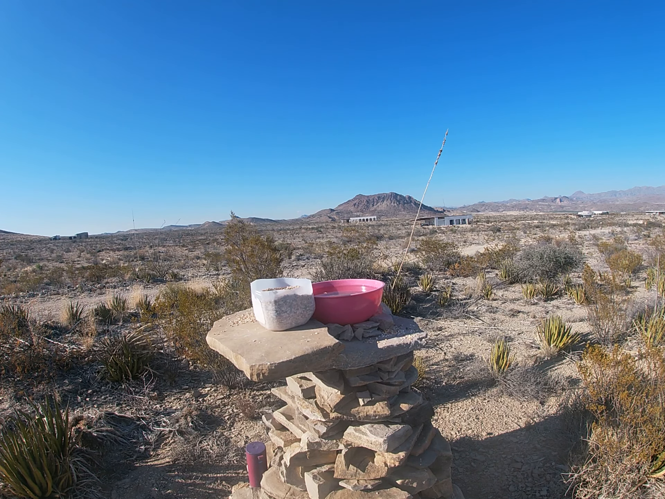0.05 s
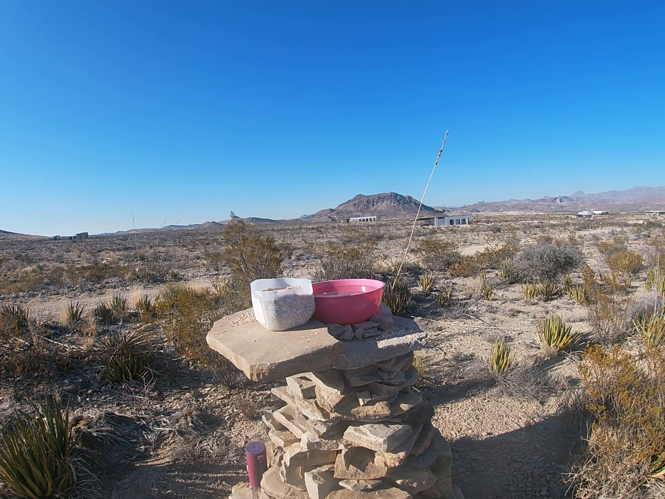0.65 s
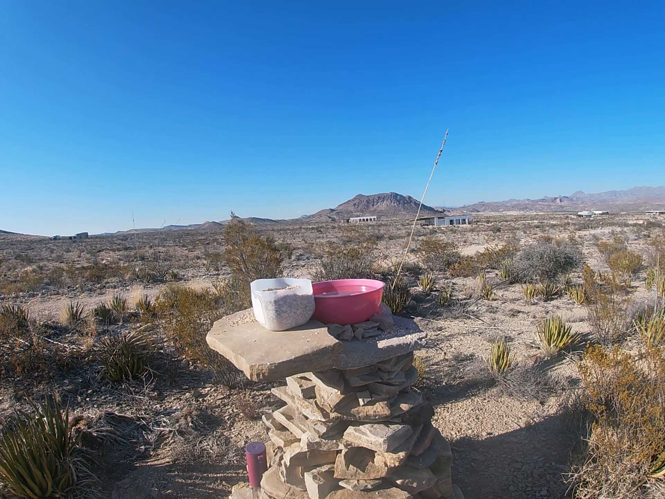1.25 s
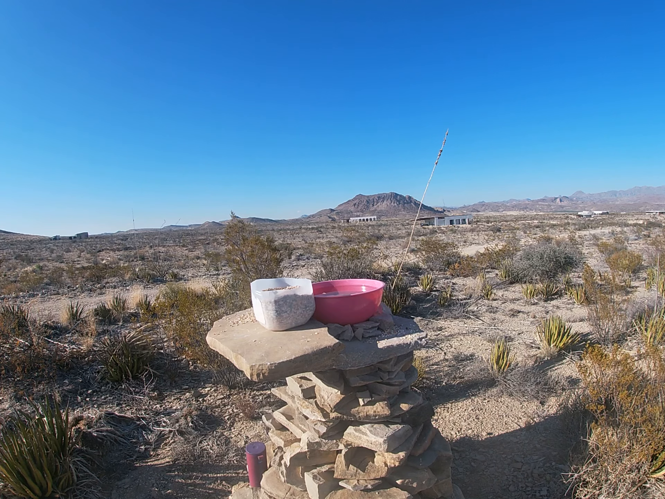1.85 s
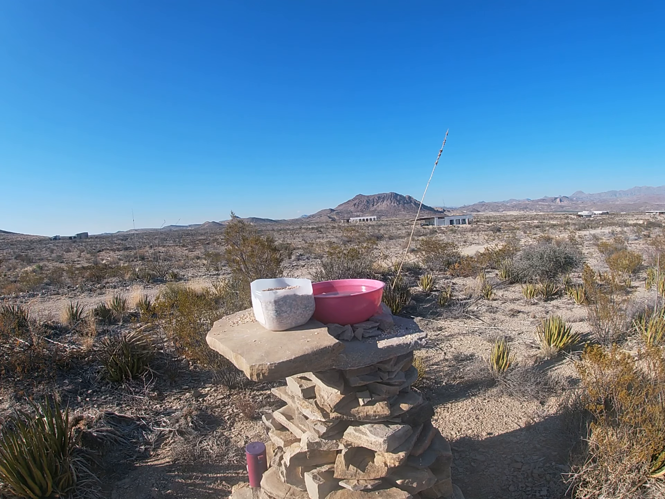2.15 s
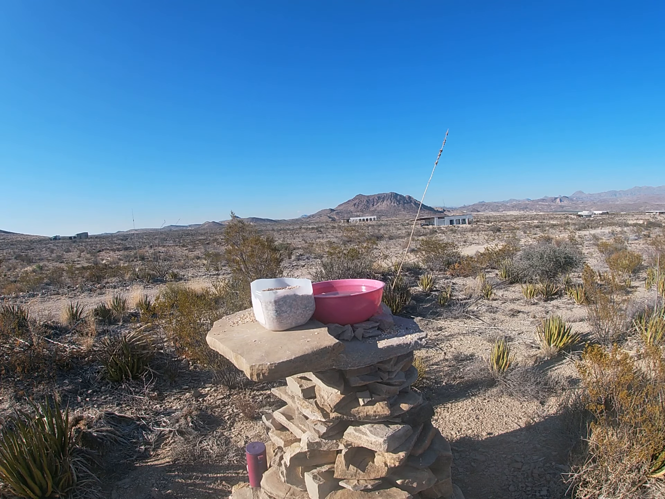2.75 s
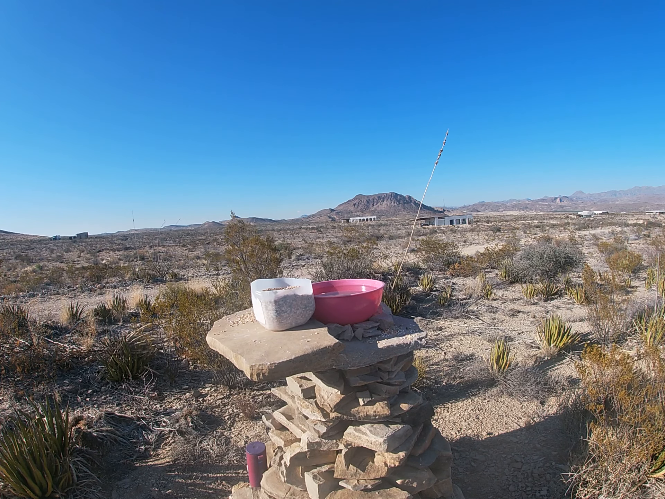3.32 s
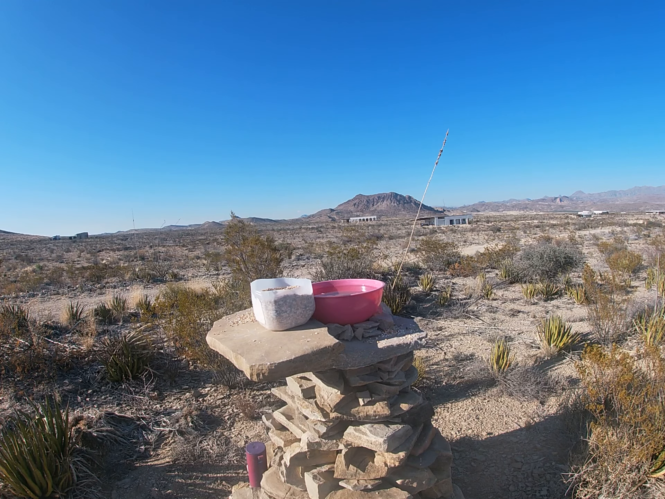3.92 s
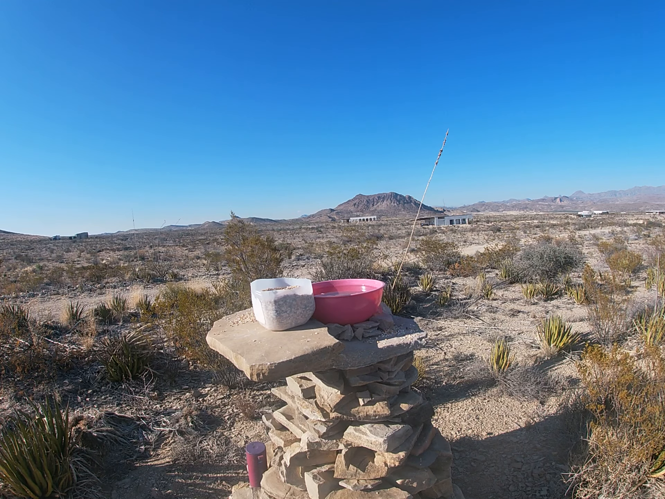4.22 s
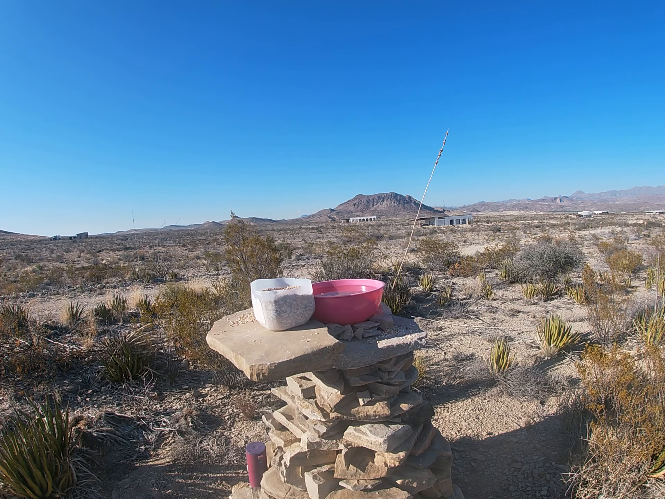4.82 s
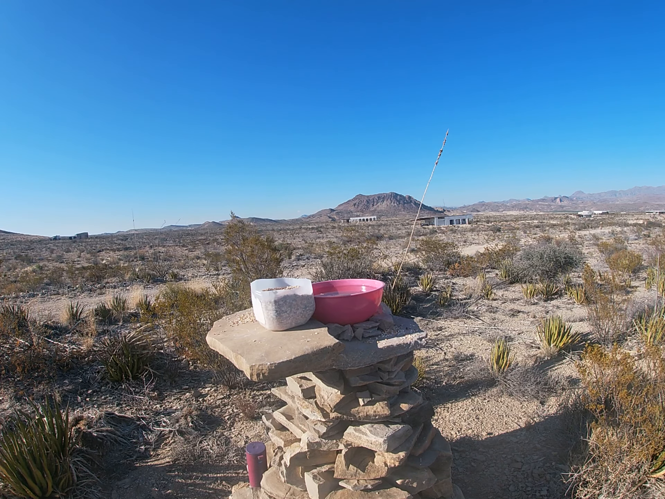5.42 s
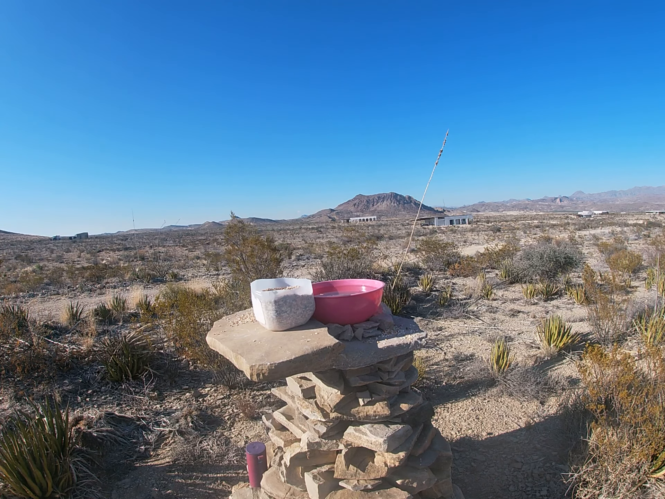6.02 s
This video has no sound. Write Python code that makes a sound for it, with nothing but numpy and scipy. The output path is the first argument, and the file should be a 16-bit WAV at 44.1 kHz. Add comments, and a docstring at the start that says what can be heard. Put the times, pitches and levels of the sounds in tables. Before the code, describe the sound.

In open desert, a light breeze rumbles on a single microphone, with a few faint, dull bumps far off. A roadrunner starts a quick run of about twenty short yips, each rising and falling in pitch. The breeze drops, then builds to a gust that thumps the microphone, and a small bird chips once nearby. The yips slow and stop, leaving wind and faint distant chirps.

```python
"""Open desert, one microphone in a light breeze. Dry scrub stirs and three dull bumps sound far off.
From about one second a roadrunner gives twenty short yips, each one arch of pitch, loudest at its top;
ground and rocks reflect them and the scrub scatters a faint tail. The breeze drops, then builds to a gust
whose eddies thump the microphone. Near four seconds a small bird chips once, close by. The yips slow
and stop at five seconds, leaving the wind and the last of a few distant chirps."""
import sys
import numpy as np
from scipy import signal
from scipy.fft import rfft, irfft
from scipy.io import wavfile
from scipy.ndimage import uniform_filter1d

SR = 44100
rng = np.random.default_rng(int(sys.argv[2]) if len(sys.argv) > 2 else 0)


def bounce(signal):
    """Save signal as a 16-bit WAV file at the path given by the first command-line argument."""
    frames = np.transpose(np.atleast_2d(signal))
    limited = np.clip(frames, -1, 1)
    pcm = np.round(limited * 32767).astype(np.int16)
    wavfile.write(sys.argv[1], SR, pcm)


N = 272272
TIME = np.arange(N) / SR

# Colours of the far-off air, a thin hiss and dry leaves. Each row: frequency in Hz, gain in dB.
AIR_SPECTRUM = [(120, -22), (200, -18), (330, -15.5), (570, -12), (640, -22), (710, -10.5), (930, -14.5),
                (1200, -28), (1500, -23.5), (1900, -33), (2900, -34.5), (4000, -63), (7000, -92)]
HISS_SPECTRUM = [(300, -6.5), (2500, 0.5), (3800, -1), (5300, 0.5), (7500, -5.5), (10000, -12.5),
                 (12500, -22.5)]
LEAF_SPECTRUM = [(200, -7), (400, 14), (1000, -2.5), (2500, -10), (5500, -7), (9000, -24)]
# The air settling. Each row: time in seconds, level in dB.
AIR_COURSE = [(0, -57.5), (.3, -60), (.8, -63.5), (2, -62.5), (4, -63.5), (5.3, -65.5), (6.17, -64)]
# Distant bumps. Each row: middle in seconds, frequency in Hz, level in dB, length in seconds.
FAR_BUMPS = [(0.043, 364, -44, 0.062), (0.149, 480, -50.5, 0.035), (0.326, 350, -50, 0.034)]
# Distant birds. Each row: middle in seconds, pitch in Hz, level in dB, length in seconds,
# pitch scatter as a share.
FAR_CHIRPS = [(1.945, 6300, -71.5, 0.057, .06), (3.032, 4920, -69, 0.026, 0.029),
              (5.419, 2610, -65, 0.033, 0.093), (5.964, 2100, -67, 0.075, 0.11)]
# The close bird's one chip. Each row: time in seconds, pitch in Hz, level in dB.
NEAR_CHIP = [(3.9825, 7200, -68), (3.9845, 6750, -50), (3.9875, 6750, -50), (3.9905, 7000, -45),
             (3.994, 7250, -49), (3.999, 7450, -52), (4.001, 7300, -70)]
# Wind at the microphone. Each row: time in seconds, relative level in dB, hardness in dB (more gust).
WIND_COURSE = [(0, -48, -21.5), (.15, -38, -23), (0.359, -44.5, -18.5), (.7, -40.5, -24.5),
               (1.35, -49, -14.5), (1.88, -43.5, -15), (2.15, -65.5, -15), (2.5, -50, -15),
               (2.95, -50, -11.5), (3.27, -45, -10.5), (3.399, -38.5, -7.5), (3.72, -40, -7.5),
               (3.92, -52.5, -15.5), (3.99, -34, -8.5), (4.3, -23, -6), (4.599, -37, -7), (4.73, -30, -8.5),
               (4.98, -38.5, -14.5), (5.18, -33.5, -17), (5.36, -38.5, -18.5), (5.88, -34.5, -6.5),
               (6.17, -54, -19)]
# Rumble of a light breeze and of a hard gust. Each row: frequency in Hz, gain in dB.
BREEZE_SPECTRUM = [(10, -8.5), (25, 4.5), (42, 4), (70, -5), (110, -30.5), (170, -33), (260, -48),
                   (500, -62), (1000, -87.5)]
GUST_SPECTRUM = [(10, -20.5), (25, 0.5), (50, 1), (95, 0), (140, -7.5), (200, -19.5), (300, -33.5),
                 (500, -51), (1000, -91.5)]
# Eddies striking the microphone. Each row: middle in seconds, relative level in dB, frequency in Hz.
EDDY_THUMPS = [(0.976, -34, 133), (1.206, -25.5, 82), (1.53, -25.5, 70), (1.83, -28, 101.4),
               (2.31, -45.5, 150), (2.575, -40, 135), (3.041, -22.5, 66), (3.385, -18.5, 83.3),
               (3.519, -16, 82.3), (3.747, -27.5, 88.6), (3.977, -16, 73), (4.145, -12, 64.7),
               (4.28, -13, 71), (4.308, -11.5, 101), (4.331, -13.5, 95), (4.493, -13.5, 105.5),
               (4.682, -15, 81), (4.731, -11, 83.4), (5.141, -17, 32), (5.236, -15.5, 36.4),
               (5.72, -21.5, 119.5), (5.799, -33, 87.4), (5.83, -20.5, 118)]
# Reflections off ground and rocks. Each row: delay in seconds, gain.
GROUND_ECHOES = [(.00611, .35), (.0118, .26), (.0218, .16)]
# Colour of the scatter from the scrub. Each row: frequency in Hz, gain in dB.
SCRUB_SPECTRUM = [(250, -5.5), (550, -9), (1030, -2), (1160, 5), (1290, -1), (1700, -4), (3000, 3.5),
                  (7000, 1.5)]
# The roadrunner's voice sent into that scatter. Each row: time in seconds, gain in dB.
SCRUB_SEND = [(1, -17), (2.3, -19.5), (3.3, -16.5), (3.9, -18), (4.7, -14.5), (5.1, -9.5)]
# The run of yips. Each row: time of the top in seconds, top pitch in Hz, effort in dB, rise and fall
# in seconds, lift above the second harmonic in dB, lift of the second in dB.
YIP_RUN = [(0.8875, 464, -39.5, 0.0056, 0.037, 4.0, -3), (1.096, 545, -24, 0.024, 0.042, 2.5, -4.0),
           (1.2936, 568.0, -22, 0.03, 0.033, 3.5, -0.6), (1.4855, 581, -19, 0.0316, 0.032, 0.7, -2.5),
           (1.674, 587.5, -19, 0.031, 0.036, -0.6, -1.6), (1.8698, 588.6, -19, 0.033, 0.032, -0.5, -0.8),
           (2.0579, 587.7, -19, 0.031, 0.0343, -2.2, -0.6), (2.2526, 587, -20, 0.029, 0.033, 0.1, -0.5),
           (2.4428, 586.7, -19, 0.03, 0.034, -0.2, -1.2), (2.646, 587.7, -19.5, 0.027, 0.031, 0.4, 0),
           (2.8659, 580.5, -19.5, 0.03, 0.029, 0.6, -1), (3.0909, 476, -32, 0.015, 0.029, -0.5, -2),
           (3.2531, 575.0, -20.5, 0.029, 0.032, 2, -0.5), (3.481, 587.8, -19.5, 0.0321, 0.0341, 1, -0.5),
           (3.7031, 581, -20, 0.03, 0.032, 1.2, 1.7), (3.9284, 581, -20, 0.033, 0.031, 0.5, 1.5),
           (4.168, 584.4, -19.5, 0.032, 0.029, -0.3, -0.3), (4.4294, 565.8, -21.9, 0.036, 0.03, 1.5, 2.5),
           (4.6961, 570, -20.5, 0.032, 0.03, 1.5, 0.5), (5.0565, 522.3, -26.5, 0.0368, 0.0271, -0.4, 0.6)]
# Colours of throat and bill, and of the breath. Each row: frequency in Hz, gain in dB.
THROAT_RESPONSE = [(280, 3.5), (370, -13.5), (450, 2.5), (600, -4.5), (900, -12), (1000, -16),
                   (1150, -11.5), (1280, -12), (1420, -7.5), (1600, -23), (1760, -23), (1950, -32.5),
                   (2080, -40.5), (2350, -43.5), (2900, -43), (3400, -64.5), (4500, -77.5), (7500, -83)]
RASP_SPECTRUM = [(200, -29.0), (600, -1.0), (1500, -7), (2100, -16.5), (3000, -25.5), (3800, -41),
                 (5100, -32), (8000, -49.0)]
# The voice gains an edge along the run. Each row: time in seconds, lift above the fourth harmonic in dB,
# gain of the bill's ring in dB.
VOICE_EDGE = [(1, -7.5, -76), (2.2, -1.5, -69), (3.2, 0.5, -66), (3.9, 2.5, -67), (4.17, 6, -57),
              (4.43, -2, -49), (4.7, 3.5, -43.5), (5.05, 1, -52)]
# The lowest yips are muffled. Each row: top pitch in Hz, lift from the fourth harmonic up in dB.
MUFFLE = [(480, -5), (520, 5), (590, 1)]
# A thin ring in the bill: frequency in Hz, width in Hz.
BILL_RING = (5120, 330)
# A higher ring: frequency in Hz, width in Hz, gain in dB.
HIGH_BILL_RING = (6430, 200, -67.5)
# The bill opens late: seconds after the top, dB on the fourth harmonic when shut, half-width in seconds.
BILL_GAPE = (0.017, -4.5, 0.017)

REST_HZ, ARCH_POWER = 284, 3.15  # foot of each arch; a higher power flattens its top
CLEAR_HZ, HOARSE_HZ = 590, 480  # top pitches of a clear yip and of a slack one
TOP_DB, ONSET_DB, RELEASE_DB = 3, -36.5, -32.5  # lift at the top; drop to the foot before and after
LEAD, TRAIL, SOFT_ENDS = 1.5, 1.864, 0.48  # span before and after the top, end fades: in rises or falls
SECOND_FADE, UPPER_FADE = (0.27, 0.097), (.84, 0)  # overtone dB lost per dB below full: rising, falling
FLUTTER_DB, FLUTTER_HZ = 2.6, 11  # random flutter of the wind
CUTOFF_HZ = 12200


def from_db(db):
    """Decibels to gain."""
    return 10 ** (np.asarray(db) / 20)


def unit(x):
    """Scales to an rms of one."""
    return x / np.sqrt(np.mean(x ** 2) + 1e-20)


def colour(points, hz):
    """Gain of a (Hz, dB) table at the given frequencies."""
    f, db = np.transpose(points)
    return from_db(np.interp(np.log(hz + 1e-9), np.log(f), db))


def tinted(x, points):
    """Filters x by a (Hz, dB) table."""
    return irfft(rfft(x) * colour(points, np.fft.rfftfreq(len(x), 1 / SR)), len(x))


def noise(spectrum, size=N):
    """Coloured noise of rms one."""
    return unit(tinted(rng.standard_normal(size), spectrum))


def follow(table, at):
    """Reads each later column of a table at the given points along its first."""
    axis, *columns = np.transpose(table)
    return [np.interp(at, axis, column) for column in columns]


def wander(size, hz):
    """Smooth random motion of rms one, up to about hz."""
    spectrum = rfft(rng.standard_normal(size)) * np.exp(-(np.fft.rfftfreq(size, 1 / SR) / hz) ** 2)
    return unit(irfft(spectrum, size))


def add(mix, s, sound):
    """Mixes a sound in from time s."""
    part = mix[max(round(s * SR), 0):][:len(sound)]
    part += sound[:len(part)]


def blurred_tone(hz, length_s, spread, blur_hz):
    """A tone that swells and fades while its pitch wavers at random."""
    size = round(length_s * SR)
    phase = 2 * np.pi * np.cumsum(hz * (1 + spread * wander(size, blur_hz))) / SR
    return np.hanning(size) * np.sin(phase)


def desert_air(waver_db=2.0, hiss_db=-78):
    """A soft far-off wash that settles slowly, over a steady thin hiss."""
    wash, hiss = noise(AIR_SPECTRUM), noise(HISS_SPECTRUM)
    level_db = follow(AIR_COURSE, TIME)[0] - waver_db * wander(N, hz=7.9)
    return from_db(level_db) * wash + from_db(hiss_db) * hiss


def rustle(level_db=-72, middle_s=.2, half_width_s=0.4, grain_db=3):
    """Dry scrub stirs briefly in the breeze at the start."""
    leaves = noise(LEAF_SPECTRUM)
    stir = np.exp(-((TIME - middle_s) / half_width_s) ** 2)
    return from_db(level_db + grain_db * wander(N, hz=60)) * stir * leaves


def distant_bumps():
    """Short, dull sounds a long way off, with no clear pitch."""
    out = np.zeros(N)
    for s, hz, level_db, length in FAR_BUMPS:
        add(out, s - length / 2, from_db(level_db) * blurred_tone(hz, length, spread=0.15, blur_hz=90))
    return out


def scrub_scatter(x, early_t60=0.068, late_t60=0.3, late_db=-13):
    """Bushes and stones scatter a quick, thin tail; farther slopes a fainter, longer one."""
    t = np.arange(SR // 2) / SR
    decay = from_db(-60 * t / early_t60) + from_db(late_db - 60 * t / late_t60)
    onset = np.clip(t / 0.012, 0, 1) ** 2
    tail = rng.standard_normal(len(t)) * decay * onset
    return signal.fftconvolve(x, tinted(tail / np.linalg.norm(tail), SCRUB_SPECTRUM))[:N]


def small_birds(scatter_db=-12):
    """One thin rising chip close to the microphone, and blurred chirps from far off."""
    birds = np.zeros(N)
    t = np.arange(NEAR_CHIP[0][0], NEAR_CHIP[-1][0], 1 / SR)
    chip_hz, chip_db = follow(NEAR_CHIP, t)
    chip_hz *= 1 + .012 * wander(len(t), hz=700)
    add(birds, t[0], from_db(chip_db) * np.sin(2 * np.pi * np.cumsum(chip_hz) / SR))
    for s, hz, level_db, length, spread in FAR_CHIRPS:
        add(birds, s - length / 2, from_db(level_db) * blurred_tone(hz, length, spread, blur_hz=500))
    return birds + from_db(scatter_db) * scrub_scatter(birds, early_t60=0.11, late_t60=.4, late_db=-11.5)


def wind(even_mix_db=-6, trim_db=1.0):
    """Turbulence at the microphone's port: the harder the gust, the higher the rumble reaches."""
    level_db, hardness_db = follow(WIND_COURSE, TIME)
    blend = np.arctan(from_db(hardness_db - even_mix_db))
    rumble = np.cos(blend) * noise(BREEZE_SPECTRUM) + np.sin(blend) * noise(GUST_SPECTRUM)
    local_rms = np.sqrt(uniform_filter1d(rumble ** 2, size=3000) + 1e-9)
    steadied = unit(rumble / np.sqrt(local_rms))
    return from_db(level_db + trim_db + FLUTTER_DB * wander(N, FLUTTER_HZ)) * steadied


def eddies(cycles=0.56, trim_db=-2, wake_db=-15, wake_s=0.037, wake_hz=90):
    """Each eddy thumps the microphone: a pressure swing in a puff of turbulence, higher if quick."""
    out = np.zeros(N)
    t = np.arange(-SR // 10, SR // 10) / SR
    for (s, level_db, hz), turn in zip(EDDY_THUMPS, rng.random(len(EDDY_THUMPS))):
        swing = np.cos(2 * np.pi * (hz * t + turn)) / np.cosh(2 * hz * t / cycles)
        churn = noise([(f * hz / wake_hz, db) for f, db in GUST_SPECTRUM], len(t))
        puff = from_db(wake_db) * np.exp(-(t / wake_s) ** 2) * churn
        add(out, s + t[0], from_db(level_db + trim_db) * (swing + puff) * np.hanning(len(t)))
    return out


def yip(s, top_hz, effort_db, rise, fall, upper_db, second_db, jitter=0.0066, rasp_db=-43, hoarse_db=16,
        sag_per_s=2.0, swell_db=0.8, swell_s=.007, hum_db=-58, slack_hum_db=17):
    """Harmonics sweep up and down through the colour of throat and bill. Returns start and sound."""
    t = np.arange(-LEAD * rise, TRAIL * fall, 1 / SR)
    arch = np.exp(-abs(t / np.where(t < 0, rise, fall)) ** ARCH_POWER)
    foot_db = np.where(t < 0, ONSET_DB, RELEASE_DB)
    level_db = TOP_DB + (1 - arch) * foot_db + swell_db * np.tanh(t / swell_s)
    # the slacker the voice, the lower and hoarser the note, and the more it droops
    slack = np.clip((CLEAR_HZ - top_hz) / (CLEAR_HZ - HOARSE_HZ), 0, 1)
    hoarse = from_db(hoarse_db * slack ** 2)
    hz = REST_HZ + (top_hz * np.exp(-sag_per_s * slack ** 2 * t) - REST_HZ) * arch
    hz *= 1 + jitter * hoarse * wander(len(t), hz=230)
    phase = 2 * np.pi * np.cumsum(hz) / SR
    k = np.arange(1, 13)[:, None]  # harmonic numbers
    edge_db, bill_db = follow(VOICE_EDGE, s)
    muffle_db = follow(MUFFLE, top_hz)[0]
    voicing_db = second_db * (k == 2) + upper_db * (k > 2) + muffle_db * (k >= 4) + edge_db * (k > 4)
    # overtones bloom only at full strength, the highest when the bill gapes
    bloom, wilt = np.where(k == 2, SECOND_FADE, UPPER_FADE).T[:, :, None]
    fade_db = np.minimum(level_db, 0) * (k > 1) * np.where(t < 0, bloom, wilt)
    gape_s, shut_db, open_s = BILL_GAPE
    shut = 1 - np.exp(-((t - gape_s) / open_s) ** 2)
    gape_db = shut * shut_db * ((k == 4) + 3 * (k > 4))
    throat = from_db(voicing_db + fade_db + gape_db) * colour(THROAT_RESPONSE, k * hz)
    bill = sum(from_db(db) * np.exp(-((k * hz - ring_hz) / width) ** 2)
               for ring_hz, width, db in [(*BILL_RING, bill_db), HIGH_BILL_RING])
    tone = ((throat + bill) * np.cos(k * phase)).sum(0)
    # air escapes in a puff each cycle and adds a slight rasp
    puffs = rng.standard_normal(len(t)) * (1 + np.cos(phase))
    rasp = from_db(rasp_db) * hoarse * unit(tinted(puffs, RASP_SPECTRUM))
    voice = from_db(effort_db + level_db) * (tone + rasp)
    # a soft hum leads into the note and trails from it
    hum = from_db(hum_db + slack_hum_db * np.sqrt(slack)) * (1 - arch) * np.cos(phase)
    gate = np.clip(np.minimum(LEAD + t / rise, TRAIL - t / fall) / SOFT_ENDS, 0, 1)
    return s + t[0], gate * (voice + hum)


def roadrunner():
    """At the microphone the gliding yips beat against their reflections, notching each rise and fall."""
    direct = np.zeros(N)
    for row in YIP_RUN:
        add(direct, *yip(*row))
    heard = direct.copy()
    for delay, gain in GROUND_ECHOES:
        add(heard, delay, gain * direct)
    send_db = follow(SCRUB_SEND, TIME)[0]
    return heard + scrub_scatter(direct * from_db(send_db))


def scene():
    """Birds, wind and open desert at one microphone."""
    mix = roadrunner() + small_birds() + distant_bumps() + wind() + eddies() + desert_air() + rustle()
    return mix[None]


def record(dry):
    """The recorder's band limit."""
    lowpass = signal.firwin(511, CUTOFF_HZ, window=("kaiser", 9), fs=SR)
    return signal.oaconvolve(dry, lowpass[None], "same")


dry = scene()
out = record(dry)
bounce(out)
```